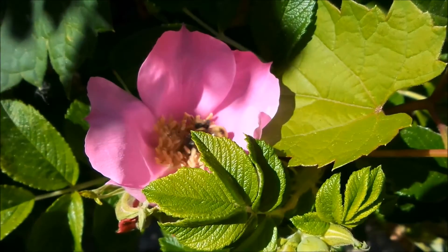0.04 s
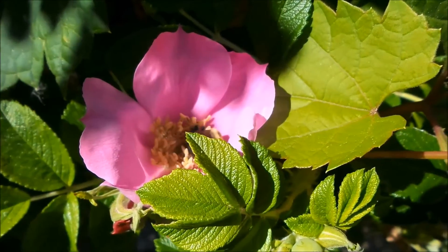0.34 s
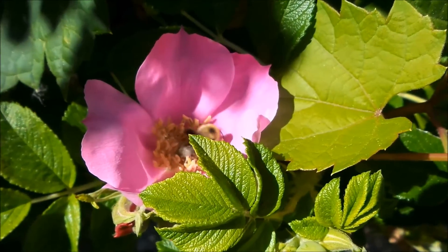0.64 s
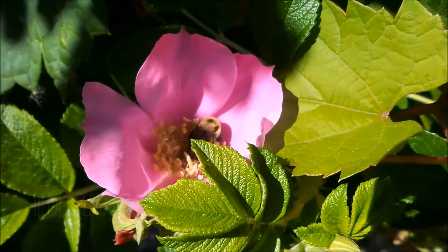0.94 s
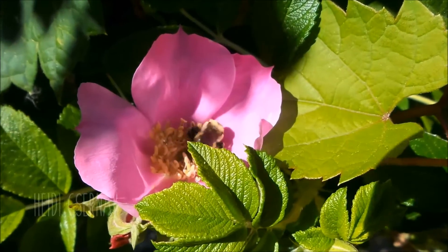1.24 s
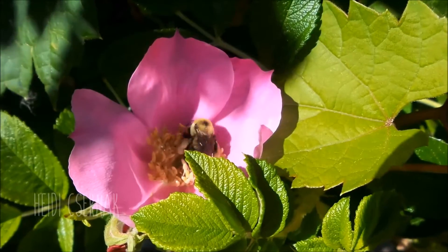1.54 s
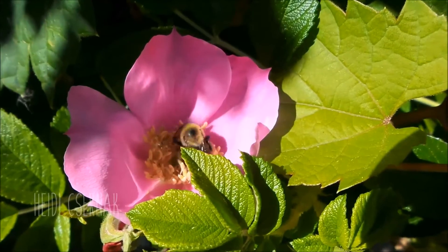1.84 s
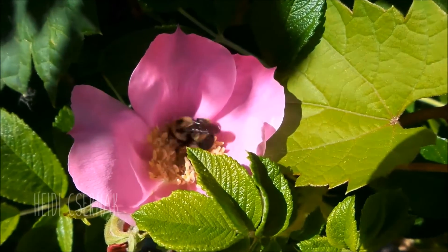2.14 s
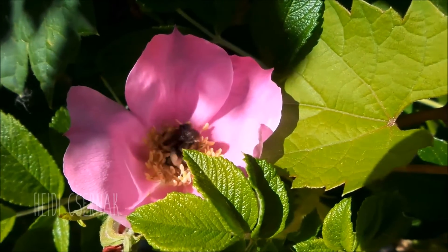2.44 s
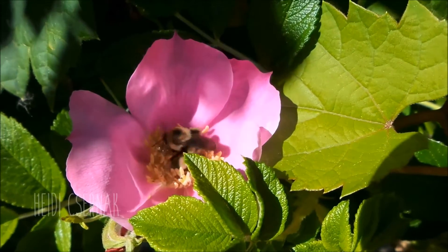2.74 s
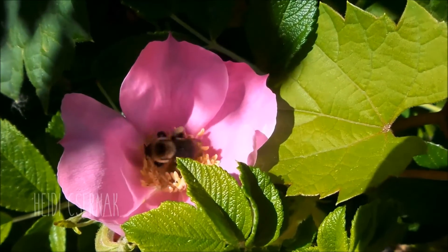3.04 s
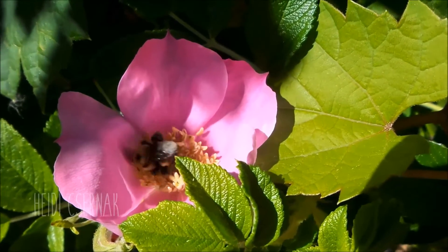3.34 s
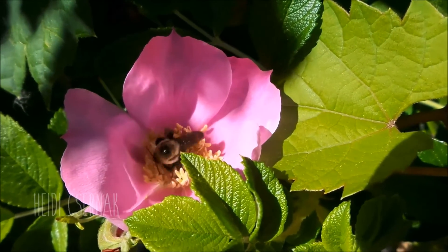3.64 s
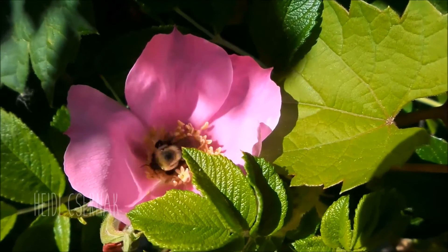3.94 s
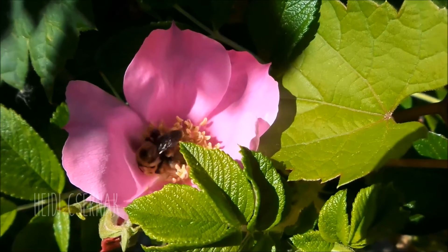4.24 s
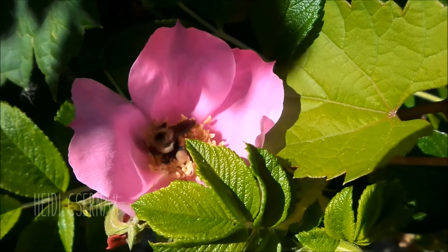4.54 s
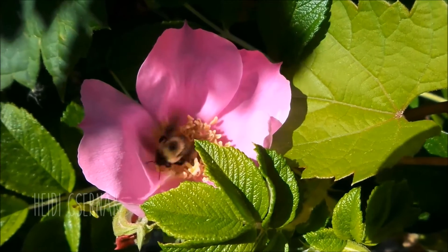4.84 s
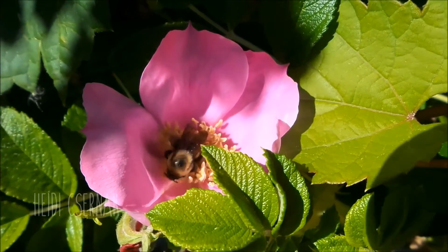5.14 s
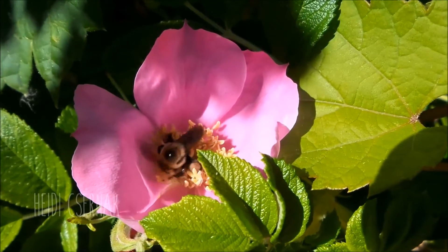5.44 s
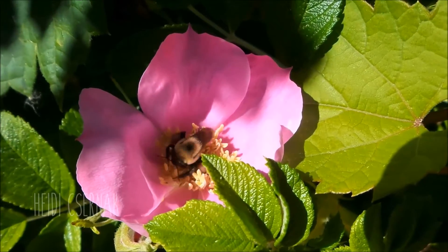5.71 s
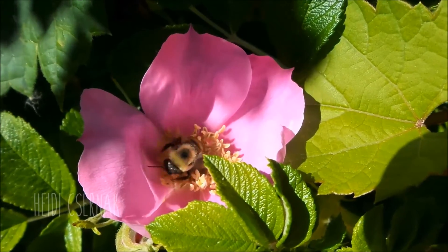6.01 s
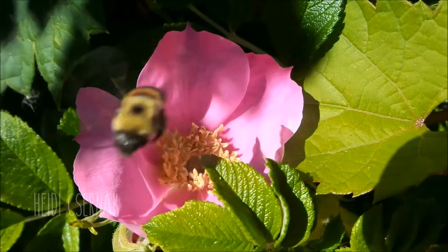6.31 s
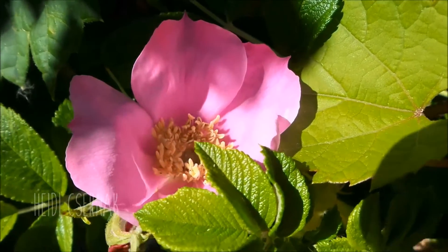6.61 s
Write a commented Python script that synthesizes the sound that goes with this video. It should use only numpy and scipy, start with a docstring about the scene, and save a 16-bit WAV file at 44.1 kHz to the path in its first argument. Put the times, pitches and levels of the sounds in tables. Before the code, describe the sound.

A bumblebee buzzes close by on a garden flower in six short, raspy bursts with a bright sizzle, each dipping slightly in pitch as it takes hold. They start at about 0.2, 1.1, 2.1, 3.4, 4.3 and 5.2 seconds and last roughly half a second each; the third begins with a stutter, and the last is a little louder, with a few tiny snaps. A small bird gives single sharp, high chips with a light echo at about 1.5, 3.1, 5 and 6.1 seconds. Around 5.8 seconds the bee's legs scrabble with a fine crackle, and from 6.1 seconds it flies off to the left with a lower, wavering hum. A dry leaf ticks once on the right at 6.8 seconds. Throughout there is a soft hiss, a faint far rumble with an engine drone, and a very faint thin whine on the right.

```python
"""Bumblebee on a rose

A bumblebee shakes out pollen in six raspy bursts: its thorax knocks on the flower once a stroke, and the
petals filter this impulse train. It scrabbles on the stamens and flies off to the left, its wings sounding
a harmonic series. A small bird's four sharp chips echo round the garden, and a dry leaf ticks once.
Beneath lie a soft hiss, a far rumble with an engine's drone, and a thin whine."""
import sys
import numpy as np
from scipy import signal
from scipy.fft import rfft, irfft
from scipy.io import wavfile

SR = 44100
rng = np.random.default_rng(int(sys.argv[2]) if len(sys.argv) > 2 else 0)


def master(y):
    """Save y as 16-bit WAV."""
    cut = np.clip(np.atleast_2d(y).T, -1, 1)
    pcm = np.round(cut * 32767)  # scale
    wavfile.write(sys.argv[1], SR, pcm.astype(np.int16))


N = 302967
TIME = np.arange(N) / SR

# background spectrum: (frequency [Hz], left gain [dB], right gain [dB])
AIR_SPECTRUM = [(20, -18, -27), (44.7, -20, -24), (65, -1, 1), (104, -6.5, -6), (128, -16.5, -14),
                (225, -21.5, -20.5), (415, -21.5, -19), (770, -15.5, -14.5), (1330, -19.5, -17),
                (2040, -21, -19), (3970, -20, -8.5), (5050, -15.5, -15), (7200, -29.5, -28),
                (10700, -32, -27), (15500, -33, -33.5)]
# likeness of the background at the two ears: (frequency [Hz], correlation [-1 to 1])
AIR_CORRELATION = [(60, 0.97), (130, 0.84), (290, 0.67), (640, 0.3), (1400, -0.32), (3100, -0.0015),
                   (7000, 0.018)]
# envelope of the distant rumble: (time [s], relative level [dB])
RUMBLE_ENVELOPE = [(0, -65.5), (.65, -61.5), (1.6, -59), (2.1, -61), (2.8, -57.5), (3.05, -64), (3.9, -58),
                   (4.2, -68), (6.87, -64)]
# buzzes on the flower, the third a false start: (start [s], end [s], relative level [dB],
# gripping stroke rate [Hz], time to grip [s], time to let go [s], sizzle peak [Hz])
BUZZES = [(0.177, 0.746, -40.5, 338.9, 0.084, 0.065, 13800), (1.119, 1.516, -38, 335, 0.076, 0.033, 13900),
          (2.1, 2.233, -37.5, 398, 0.13, 0.022, 11500), (2.212, 2.813, -37.5, 337.7, 0.064, 0.043, 10900),
          (3.37, 3.961, -37, 333, .105, .058, 10900), (4.271, 4.807, -37, 337.8, 0.072, 0.046, 10200),
          (5.209, 5.826, -35, 339.9, 0.093, .032, 10900)]
# moments when the bee bears down harder: (middle [s], half length [s], rise [dB])
GRIP_SURGES = [(1.386, 0.086, 2), (2.34, 0.026, 2.5), (2.71, 0.031, 2), (4.52, 0.058, 2)]
# dry anthers rubbing together: (frequency [Hz], left gain [dB], right gain [dB])
ANTHER_SPECTRUM = [(1000, -14, -16.5), (3000, -6, -1), (5330, 0, 0), (7230, -9, -20), (8400, -7, -0.5),
                   (9300, -20, -6.5), (12040, -21, -16.5), (16100, -24, -8)]
# the flower's response to a click: (frequency [Hz], left gain [dB], right gain [dB])
FLOWER_RESPONSE = [(300, -78.5, -63), (665, -34.5, -20), (968, -17, -12.5), (1640, -22.5, -18.5),
                   (2140, -26.5, -24), (2810, -27.5, -8.5), (3440, -8.5, -1.5), (4030, -16.5, 0.5),
                   (5090, -1, 1), (5730, -5, -10), (5920, -26.5, -14), (7030, -15, -16.5),
                   (8750, -25.5, -16.5), (9900, -20, -14.5), (10700, -42, -14), (12600, -27, -16.5),
                   (15600, -33.5, -28.5)]
# bird calls: (time [s], relative level [dB], length [s])
BIRD_CHIPS = [(1.4965, -12.5, 0.017), (3.072, -15.5, 0.019), (4.987, -18.5, 0.021), (6.098, -15, 0.02)]
# envelope of one call: (share of the length [0 to 1], gain [dB])
CHIP_ENVELOPE = [(0, -14), (.2, -6), (.45, -11.5), (.75, -9), (1, -36)]
# distinct reflections in the garden: (delay [s], gain [dB])
GARDEN_ECHOES = [(.0045, -0.5), (0.009, -18), (0.031, -7), (.046, -8)]
# sharpest catches of the legs on the stamens: (time [s], relative level [dB])
STAMEN_SNAPS = [(5.2145, -37), (5.37, -32), (5.408, -25), (5.9178, -42), (5.929, -39), (5.9752, -43),
                (5.9814, -41), (6.013, -43), (6.021, -37), (6.0677, -40), (6.1437, -31), (6.1854, -39),
                (6.1934, -35)]
# scrabbling around take-off: (middle [s], half length [s], relative level [dB])
SCRABBLE_BOUTS = [(5.842, 0.025, -41), (5.953, 0.049, -40.5), (6.053, 0.044, -45), (6.15, 0.064, -37.5),
                  (6.31, 0.087, -48)]
# the bee in the air: (time [s], wingbeat [Hz], relative level [dB], left minus right [dB])
FLIGHT_PATH = [(6.1, 168.2, -61, -1.0), (6.148, 175.8, -55, -4), (6.256, 152.6, -53, 0),
               (6.312, 162.6, -50, 2), (6.354, 157.4, -51, 5.0), (6.39, 143.2, -54.5, 7.0),
               (6.426, 154.6, -47.5, 10), (6.482, 137.8, -51.5, 15), (6.54, 158.3, -45, 34),
               (6.634, 169.2, -43, 18), (6.686, 157.2, -44, 22), (6.87, 143.2, -49, 18)]
# harmonics of the wing tone: (order [multiple of the wingbeat], gain [dB])
WING_HARMONICS = [(1, -7.5), (2, 1.5), (3, -4.5), (4, -7.5), (5, -14), (6, -10.5), (7, -14), (8, -14),
                  (9, -18.5), (10, -25), (11, -29), (12, -20)]
# air stirred by the wings: (frequency [Hz], gain [dB])
WING_AIR_SPECTRUM = [(150, -9), (400, -3.5), (1000, -1.5), (1900, -8), (3000, 0.5), (6000, -7),
                     (10500, -11), (15500, -19)]
# the leaf's single tick: (time [s], relative level [dB])
LEAF_STRIKE = (6.8026, -35.5)
# modes of the leaf: (frequency [Hz], gain [dB], time to fall 60 dB [s])
LEAF_RESONANCES = [(1523, -1, 0.013), (2207, 8, 0.0088), (3460, 5.5, 0.013), (4130, 7.5, 0.0089),
                   (6510, -14, 0.0069)]

FREE_HZ, TIGHT_HZ, LET_GO_HZ = 417.4, 296, 413  # stroke rates: ungripped, fully tight, on release
ATTACK_S, ATTACK_DB, RELEASE_S, RELEASE_DB = 0.035, -13, 0.032, -19.5
SWELL_DB_PER_S, LOOSE_DB = 3.5, -5.5  # the bee presses harder as it works; a loose grip knocks weakly
REBOUND_TIGHT, REBOUND_LOOSE = 0.62, 0.55  # return stroke as a share of the knock


def amp(db):
    """Converts decibels to an amplitude ratio."""
    return 10 ** (np.asarray(db) / 20)


def unit(x):
    """Normalises to rms 1."""
    return x / np.sqrt(np.mean(x ** 2) + 1e-20)


def columns(rows, t):
    """Interpolates each column of a curve table at the times t."""
    s, *values = np.transpose(rows)
    return [np.interp(t, s, v) for v in values]


def spectrum(rows, hz):
    """Interpolates each column of a spectrum table on a log-frequency axis."""
    f, *values = np.transpose(rows)
    return np.array([np.interp(np.log(hz + 1), np.log(f + 1), v) for v in values])


def wander(size, hz):
    """Random modulation: noise of rms 1, low-passed at hz."""
    f = np.fft.rfftfreq(size, 1 / SR)
    return unit(irfft(rfft(rng.standard_normal(size)) / (1 + (f / hz) ** 4), size))


def add(mix, s, sound):
    """Superposes a sound on a stereo mix at s seconds."""
    part = mix[:, round(s * SR):][:, :sound.shape[-1]]
    part += sound[..., :part.shape[1]]


def clicks(times, sizes):
    """Band-limited impulses: windowed sincs place each click between samples."""
    at = np.asarray(times)[:, None] * SR
    near = at.astype(int) + np.arange(-8, 9)
    shape = np.sinc(near - at) * np.cos((near - at) * np.pi / 18) ** 2
    return np.bincount(near.ravel(), (shape * sizes[:, None]).ravel(), N)[:N]


def garden_air(hiss_db=-53.5, swell_db=0.58, rumble_gain_db=-3, crossover_hz=125):
    """Partly correlated noise: a soft hiss over a far rumble that is nearly alike at both ears."""
    hz = np.fft.rfftfreq(N, 1 / SR)
    common, separate = rfft(rng.standard_normal((2, N)))
    correlation = spectrum(AIR_CORRELATION, hz)[0]
    right = correlation * common + np.sqrt(1 - correlation ** 2) * separate
    noise = np.array([common, right]) * amp(spectrum(AIR_SPECTRUM, hz))
    low = 1 / (1 + (hz / crossover_hz) ** 8)
    hiss = unit(irfft(noise * (1 - low), N)) * amp(hiss_db + swell_db * wander(N, 8.1))
    rumble = unit(irfft(noise * low, N)) * amp(columns(RUMBLE_ENVELOPE, TIME)[0] + rumble_gain_db)
    return hiss + rumble


def far_engine(hz=70, gain_db=-3, drift_hz=1.25):
    """An engine's drone: a drifting sinusoid, amplitude-modulated by the rumble's envelope."""
    phase = 2 * np.pi * np.cumsum(hz + drift_hz * wander(N, 3.6)) / SR
    return np.sin(phase) * amp(columns(RUMBLE_ENVELOPE, TIME)[0] + gain_db)


def whine(hz=2805, left_db=-76, right_db=-57, drift_hz=3, flicker_db=1.0):
    """A thin tone, mostly on the right, with slight random frequency and amplitude modulation."""
    phase = 2 * np.pi * np.cumsum(hz + drift_hz * wander(N, 29.6)) / SR
    return amp([[left_db], [right_db]]) * np.sin(phase) * amp(flicker_db * wander(N, 25))


def stroke_rate(t, start, end, grip_hz, grip_s, let_go_s, sag_hz_per_s=81, steepness=2.2):
    """A loaded oscillator: the thorax slows as the bee grips, sags, and speeds up on release."""
    age = t - start
    held = grip_hz - sag_hz_per_s * age
    free = np.exp(-(abs(age) / grip_s) ** steepness)
    released = (1 - free) * np.exp((t - end) / let_go_s)
    return held + (FREE_HZ - held) * free + (LET_GO_HZ - held) * released


def thorax_knocks(t, cycles, hz, db, slack, return_phase=0.497, return_drift=0.012):
    """Impact train: a knock and a softer pull each stroke. A tight, even grip gives clear harmonics."""
    at = np.interp(np.arange(1, int(cycles[-1]) - 1), cycles, t)
    rate, strength, loose = (np.interp(at, t, v) for v in (hz, amp(db), slack ** 2))
    rebound = REBOUND_TIGHT + (REBOUND_LOOSE - REBOUND_TIGHT) * loose
    knock_shift, knock_spread, pull_shift, pull_spread = rng.standard_normal((len(at), 4)).T
    size = strength * np.sqrt(SR / rate / (1 + rebound ** 2))  # power independent of stroke rate
    gap_s = (return_phase + return_drift * np.interp(at, t, wander(len(t), 23))) / rate
    # a loose grip scatters timing and strength
    jitter_s = 5e-6 + 7e-5 * loose
    uneven_db = 0.7 + 1.5 * loose
    knocks = clicks(at + knock_shift * jitter_s, size * amp(uneven_db * knock_spread))
    pull_times = at + gap_s + pull_shift * (jitter_s + 5e-6)
    return knocks - clicks(pull_times, size * rebound * amp(2 * uneven_db * pull_spread))


def anther_sizzle(cycles, peak_hz, peak_db=8.5, width_hz=1100):
    """Friction noise: a bright decaying puff every half stroke, independent at each ear."""
    hz = np.fft.rfftfreq(len(cycles), 1 / SR)
    colour_db = spectrum(ANTHER_SPECTRUM, hz) + peak_db * np.exp(-((hz - peak_hz) / width_hz) ** 2)
    puffs = rng.standard_normal((2, len(cycles))) * np.exp(-(2 * cycles % 1))
    return unit(irfft(rfft(puffs) * amp(colour_db), len(cycles)))


def buzz(start, end, strength_db, grip_hz, grip_s, let_go_s, sizzle_hz,
         force_gain_db=4.5, rustle_gain_db=-22, sizzle_gain_db=-8, waver=0.005):
    """Forced vibration, looser at faster strokes. Returns the force on the flower and the sizzle."""
    t = np.arange(start, end, 1 / SR)
    hz = stroke_rate(t, start, end, grip_hz, grip_s, let_go_s)
    slack = np.clip((hz - TIGHT_HZ) / (FREE_HZ - TIGHT_HZ), 0, 1)
    db = strength_db + SWELL_DB_PER_S * (t - start) + LOOSE_DB * slack
    db += ATTACK_DB * np.exp((start - t) / ATTACK_S) + RELEASE_DB * np.exp((t - end) / RELEASE_S)
    db += sum(rise * np.exp(-((t - middle) / half) ** 2) for middle, half, rise in GRIP_SURGES)
    db += (0.7 + 1.5 * slack) * wander(len(t), 40)  # a tremble that sputters when slack
    cycles = np.cumsum(hz * (1 + waver * wander(len(t), 28.7))) / SR
    knocks = thorax_knocks(t, cycles, hz, db, slack)
    # the anthers go on rustling after each knock
    rustle = unit(np.exp(-(cycles % 1) / 3.9) * rng.standard_normal(len(t))) * amp(db + rustle_gain_db)
    force = amp(force_gain_db) * (knocks + np.interp(TIME, t, rustle, left=0, right=0))
    sizzle = np.zeros((2, N))
    add(sizzle, start, anther_sizzle(cycles, sizzle_hz) * amp(db + sizzle_gain_db))
    return force, sizzle


def flower(force, size=4096):
    """Resonance: the force is convolved with the short minimum-phase ring of petals and stamens."""
    log_gain = np.log(amp(spectrum(FLOWER_RESPONSE, abs(np.fft.fftfreq(size, 1 / SR)))))
    minimum_phase = np.exp(np.conj(signal.hilbert(log_gain)))
    ring = np.fft.ifft(minimum_phase).real[:, :size // 2]
    ring[1] = np.roll(ring[1], 2)  # reaches the right ear two samples later
    return signal.oaconvolve(force[None], ring / np.linalg.norm(ring[1]), axes=1)[:, :N]


def petal_reflection(x, delay_s=0.000469, sway_s=0.00002, sway_hz=3, share=0.4):
    """Comb filtering: a reflection off the petals, its path changing as the bee turns."""
    late = [np.interp(TIME - delay_s - sway_s * wander(N, sway_hz), TIME, side) for side in x]
    return x + share * np.array(late)


def chip(db, length, low_hz=4750, top_hz=7400, rise_s=0.0069, octave_db=-24, rasp=0.0055):
    """A frequency sweep: one quick upward whistle that levels off, with a faint second harmonic."""
    t = np.arange(0, length, 1 / SR)
    sweep_hz = top_hz - (top_hz - low_hz) * np.exp(-t / rise_s)
    phase = 2 * np.pi * np.cumsum(sweep_hz * (1 + rasp * wander(len(t), 650))) / SR
    envelope = amp(db + columns(CHIP_ENVELOPE, t / length)[0]) * signal.windows.tukey(len(t), 0.1)
    return envelope * (np.sin(phase) + amp(octave_db) * np.sin(2 * phase))


def garden_reverb(x):
    """Reverberation: scatter from near leaves, a few distinct echoes and a thin outdoor tail."""
    t = np.arange(SR // 2) / SR

    def scatter(db, t60):
        """Diffuse reflections: noise that falls 60 dB in t60 seconds."""
        taps = rng.standard_normal((2, len(t))) * amp(-60 * t / t60)
        return amp(db) * taps / np.linalg.norm(taps, axis=1, keepdims=True)
    leaves, tail, far = scatter(-7, t60=0.022), scatter(-9, t60=0.66), scatter(-21, t60=0.33)
    response = leaves + tail + far
    response[:, 0] += 1  # direct path
    for delay, db in GARDEN_ECHOES:
        add(response, delay, scatter(db, t60=0.098))
    return signal.oaconvolve(x, response, axes=1)[:, :N]


def bird():
    """Multipath propagation: four chips from the bushes arrive directly and by reflection."""
    calls = np.zeros((2, N))
    for s, db, length in BIRD_CHIPS:
        add(calls, s, chip(db, length))
    return garden_reverb(calls)


def legs(snap_gain_db=23, snap_lag_s=0.000585, grains_per_s=900, pre_emphasis=0.86):
    """Impulsive excitation: legs snap the stamens and scrabble in bouts of fine, crisp crackle."""
    s, db = np.transpose(STAMEN_SNAPS)
    snaps = clicks(s + snap_lag_s, amp(db + snap_gain_db))
    grains = unit(rng.standard_normal(N) * (rng.random(N) < grains_per_s / SR))
    effort = sum(amp(level) * np.exp(-((TIME - middle) / half) ** 2)
                 for middle, half, level in SCRABBLE_BOUTS)
    return signal.lfilter([1, -pre_emphasis], [1], snaps + grains * effort)


def wing_tone(flutter=0.14, blur_rad=0.076, waver=0.0063, far_flutter=0.6, rise_s=0.018):
    """A harmonic series on the wingbeat, higher orders fluttering more, as the bee leaves to the left."""
    hz, db, pan_db = columns(FLIGHT_PATH, TIME)
    cycles = np.cumsum(hz * (1 + waver * wander(N, 44))) / SR
    near, far = np.zeros((2, N))
    for k, order_db in WING_HARMONICS:
        phase = 2 * np.pi * (k * cycles + rng.random()) + blur_rad * k * wander(N, 37)
        partial = amp(order_db) * (1 + flutter * np.sqrt(k) * wander(N, 26)) * np.cos(phase)
        near += partial
        far += partial + far_flutter * amp(order_db) * wander(N, 23) * np.sin(phase)
    left = amp(pan_db) / (1 + amp(pan_db))
    onset = np.clip((TIME - FLIGHT_PATH[0][0]) / rise_s, 0, 1)
    return 2 * np.array([left * unit(near), (1 - left) * unit(far)]) * amp(db) * onset


def wing_air(left_db=-52, right_db=-50, rise_s=0.021, beat_depth=0.24):
    """Flow noise: a soft rush, amplitude-modulated at the wingbeat once the bee is in the air."""
    cycles = np.cumsum(columns(FLIGHT_PATH, TIME)[0]) / SR
    puffs = rng.standard_normal((2, N)) * (1 + beat_depth * np.cos(2 * np.pi * cycles))
    colour = amp(spectrum(WING_AIR_SPECTRUM, np.fft.rfftfreq(N, 1 / SR)))
    rush = unit(irfft(rfft(puffs) * colour, N))
    onset = np.clip((TIME - FLIGHT_PATH[0][0]) / rise_s, 0, 1)
    return amp([[left_db], [right_db]]) * rush * onset


def leaf_tick(left_gain_db=-8):
    """Free vibration: the damped modes of a dry leaf give one tick on the right."""
    s, strike_db = LEAF_STRIKE
    t, out = np.arange(SR // 20) / SR, np.zeros((2, N))
    ring = sum(amp(db - 60 * t / t60) * np.sin(2 * np.pi * hz * t) for hz, db, t60 in LEAF_RESONANCES)
    add(out, s, amp([[left_gain_db], [0]]) * amp(strike_db) * ring)
    return out


def scene():
    """Superposition of the bee, the bird, the leaf and the background."""
    forces, sizzles = zip(*(buzz(*row) for row in BUZZES))
    on_flower = petal_reflection(flower(sum(forces) + legs())) + sum(sizzles)
    bee = on_flower + wing_tone() + wing_air()
    return bee + bird() + leaf_tick() + garden_air() + far_engine() + whine()


def record(dry):
    """Band limiting: a linear-phase low-pass filter cuts the treble above 15.9 kHz."""
    low_pass = signal.firwin(511, 15900, window=("kaiser", 9), fs=SR)
    return signal.oaconvolve(dry, low_pass[None], "same")


dry = scene()
out = record(dry)
master(out)
```